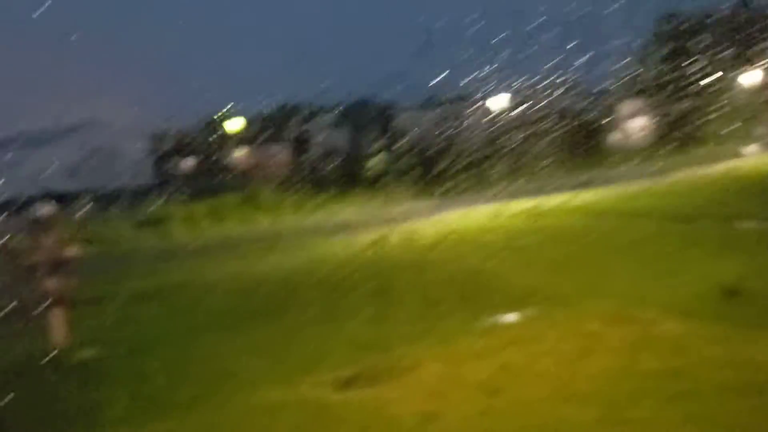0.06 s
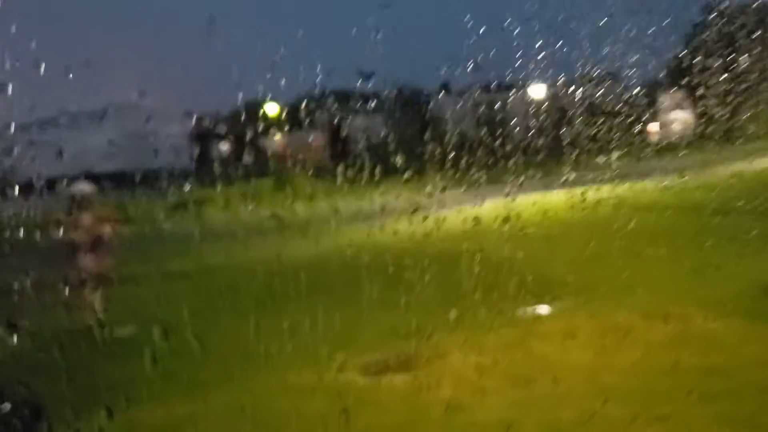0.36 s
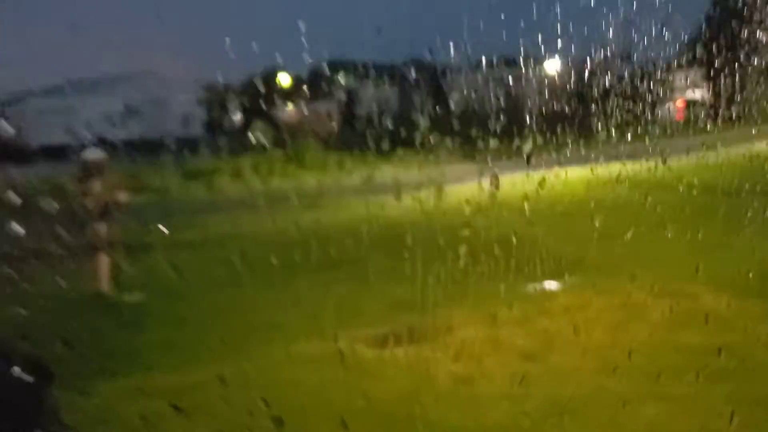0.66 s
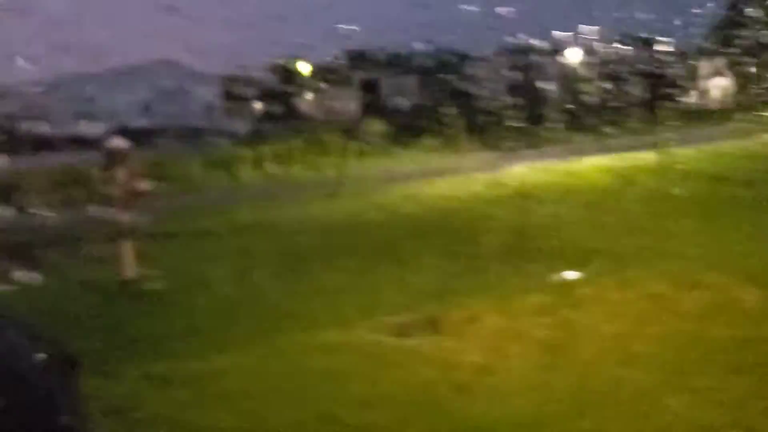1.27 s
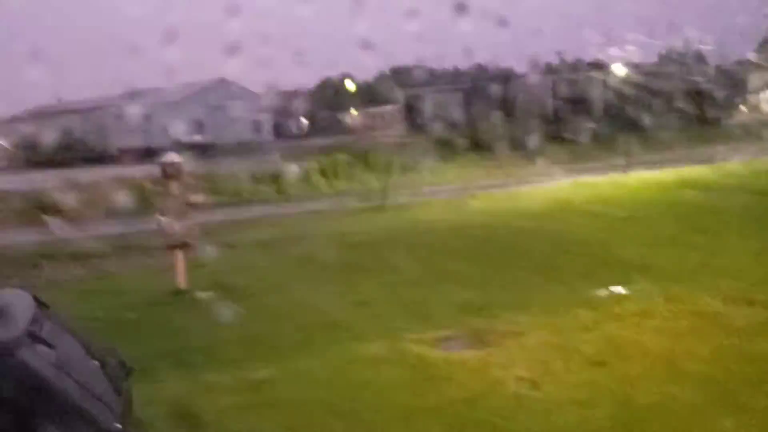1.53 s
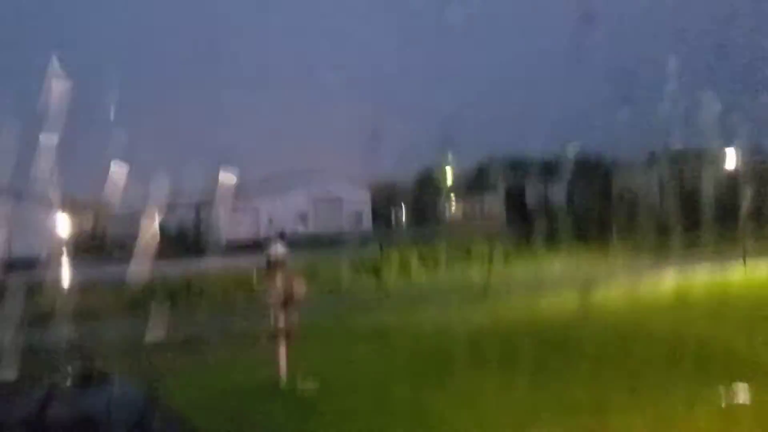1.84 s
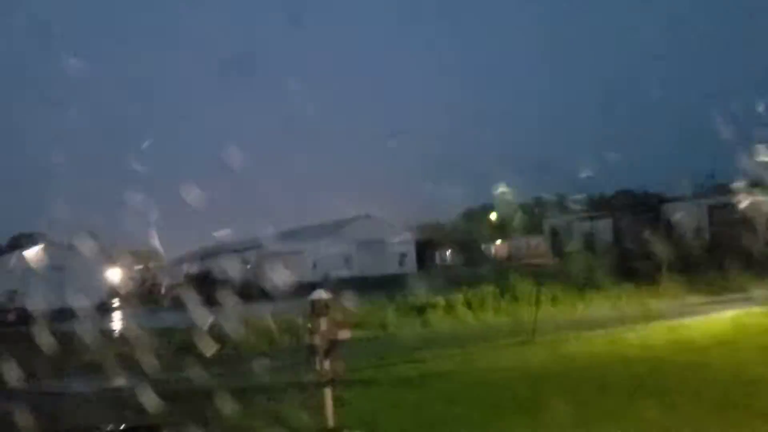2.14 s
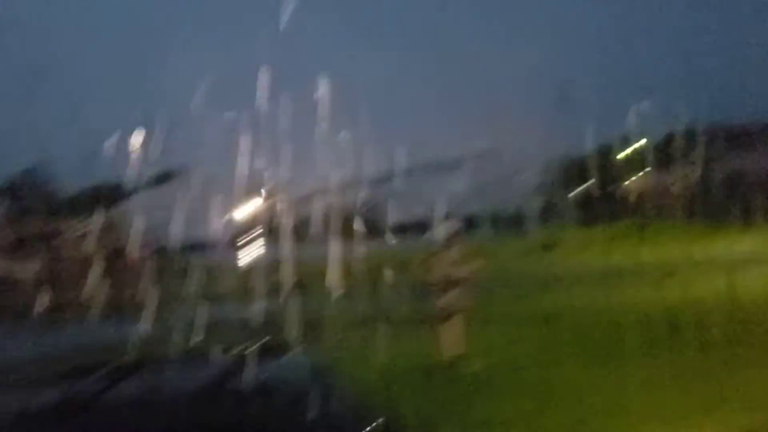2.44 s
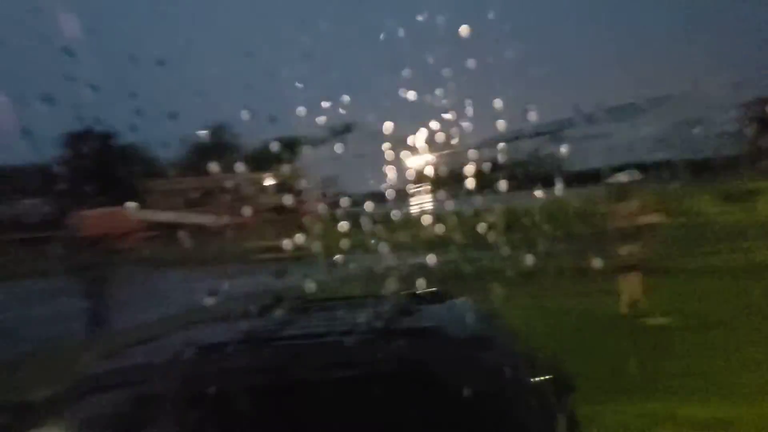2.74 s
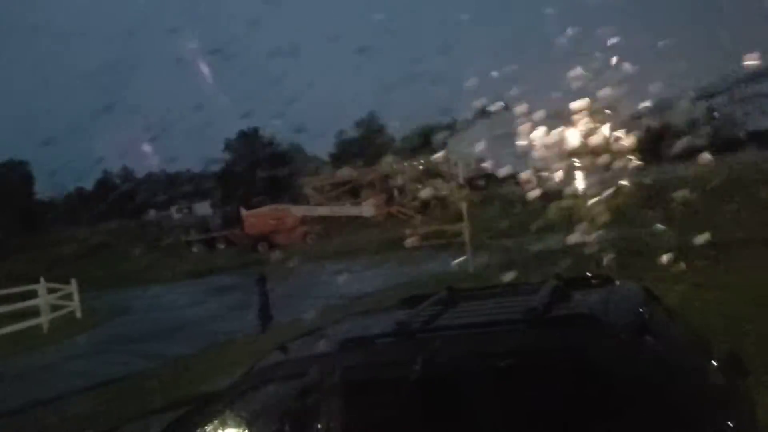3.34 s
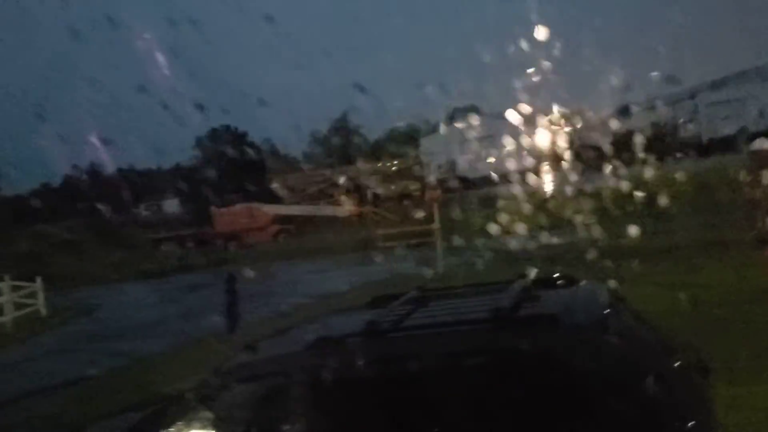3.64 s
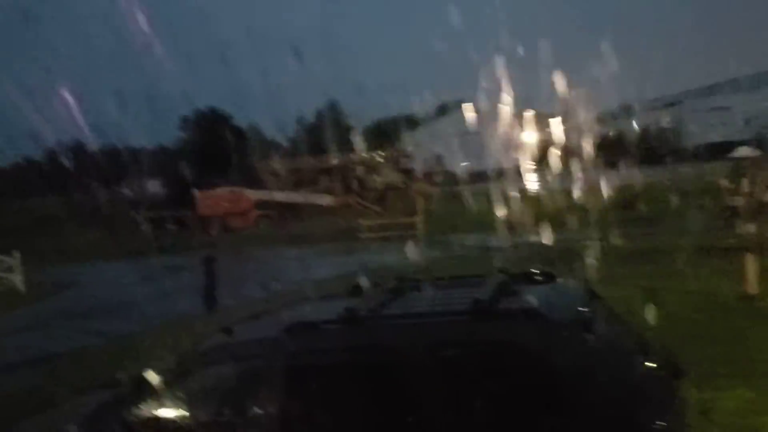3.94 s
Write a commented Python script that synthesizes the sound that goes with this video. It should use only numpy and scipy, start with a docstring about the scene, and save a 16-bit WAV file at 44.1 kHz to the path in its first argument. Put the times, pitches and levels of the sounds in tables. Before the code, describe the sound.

Deep thunder swells and keeps rolling, heard from a window over a soft hiss of rain. Close on the right, heavy drops or hail strike sharply and ring briefly in the room, with lighter ticks and one hollow plop between.

```python
"""Thunder breaks after a second and rolls on in deep peals, heard from a window over steady rain.
Heavy drops or hailstones crack on something hard close by, mostly to the right, and the room rings
after them. Lighter drops tick and splash in between, and one lands with a hollow plop.
The thunder is low noise plus short, wavering tones. The rain is a hiss of countless far drops.
Each hard hit is a brief push that makes the struck surface ring."""
import sys
import numpy as np
from scipy import signal
from scipy.fft import rfft, irfft, next_fast_len
from scipy.io import wavfile
from scipy.ndimage import uniform_filter1d, map_coordinates

SR = 44100
rng = np.random.default_rng(int(sys.argv[2]) if len(sys.argv) > 2 else 0)


def wrap_up_sound(samples):
    """Save the sound to the file named by the first command line argument, as 16-bit audio."""
    columns = np.atleast_2d(samples).T
    # keep every value between -1 and 1, then stretch to whole-number steps
    tamed = np.clip(columns, -1, 1)
    steps = np.round(tamed * 32767).astype(np.int16)
    wavfile.write(sys.argv[1], SR, steps)


N = 176400

# how loud the rain is, before its boosts (time [s], wash level [dB], hiss level [dB])
RAIN_LEVELS = [(0.0, -55, -69.5), (1.32, -57, -68.5), (1.95, -60.5, -73.5), (2.31, -61, -68),
               (2.97, -60, -75), (4.0, -62.5, -78)]
# tone of the rain's broad wash and of its finer hiss (frequency [Hz], level [dB])
WASH_TONE = [(100, -11.5), (400, 3.5), (800, 1), (1250, -3), (1800, -0.5), (2500, -4.5), (3200, -12.5),
             (4500, -34), (7000, -41)]
HISS_TONE = [(1500, -16), (3200, 0), (4000, 1), (5200, 0.5), (6400, -3.5), (6900, -14.5), (7400, -70.5),
             (12000, -17), (16000, -21)]
# how alike the rain is in both ears (frequency [Hz], likeness [0 to 1])
RAIN_LIKENESS = [(200, 0.63), (600, 0.41), (1200, 0), (6000, 0)]
# thin sizzles in the rain (peak time [s], level [dB], pitch [Hz], half length [s])
RAIN_SIZZLES = [(1.1, -70, 5220, 0.36), (2.14, -67.5, 4100, 0.13)]

# how long the room rings; a fade time is the time to fall by 60 dB (frequency [Hz], fade time [s])
ROOM_FADES = [(1000, 0.29), (3000, 0.37), (6000, 0.29), (10000, 0.28), (15000, 0.31)]
# tone the room gives its echo (frequency [Hz], level [dB])
ROOM_TONE = [(1800, 4), (6300, -2), (9000, 2), (15000, 4.5)]

# light drops, and the two contacts of the plop (time [s], level [dB])
TICK_HITS = [(0.032, -57), (0.114, -54.5), (1.341, -49), (2.7264, -54.5), (2.8393, -51), (3.241, -58),
             (3.64, -60)]
PLOP_HITS = [(2.728, -37.5), (2.735, -46)]
# the plop's hollow resonances (pitch [Hz], width [Hz], level [dB])
PLOP_RESONANCES = [(1174, 240, -6), (1720, 240, 7), (2680, 450, -14.5)]
# soft splashes (time [s], level [dB], fade time [s])
SPLASH_HITS = [(1.338, -60, 0.17), (3.54, -51, 0.32)]
# tone of a tick, a splash and a hard hit (frequency [Hz], level [dB])
TICK_TONE = [(800, -5), (2500, -8), (3850, 4), (5000, -1.5), (6400, -3.5), (7400, -29)]
SPLASH_TONE = [(400, 1), (1500, 2), (2600, -1), (3500, -13.5), (8000, -36)]
CRACK_TONE = [(300, -10.5), (1200, -11), (2300, -2.5), (4500, -2.5), (6200, -1), (6900, -7.5), (7700, -21),
              (8500, -19), (9500, -14.5), (12000, -18.5), (15500, -30)]

# hard hits (time [s], level [dB], treble tilt [dB per octave], top sparkle [dB], contact length [s],
# surface ring [dB], pitch of the struck spot [Hz], boost at that pitch [dB])
HARD_HITS = [(.9930, -37.5, -.5, 3.5, 0.022, 8, 3600, -2), (1.2036, -28, -1, 2.5, 0.023, 11, 1470, 14.5),
             (1.2226, -30, 2, -4.5, 0.04, 4.5, 2150, 2), (1.2285, -31, -3.5, 4, 0.01, 1.5, 6270, 9),
             (1.5060, -32.5, 0, 4, 0.011, 6, 2970, 8), (1.7135, -36, -3.5, -2, 0.0049, 3, 3780, 7.5),
             (1.7505, -34.5, 1, -2.5, 0.0027, 7, 3500, 7.5), (1.7626, -39, 1, -1, 0.0033, 4.5, 6300, 3.5),
             (2.2539, -35, -3, -1.5, .018, 6, 4100, 13), (2.2840, -33.5, 1, 0, .011, 3, 4000, 9.5),
             (2.2934, -42, -1, 4, .01, 8.5, 2640, 5.5), (3.2877, -28.5, 1.5, 3.5, .012, 13.5, 5640, 4.5)]
# how far right the hard hits sound (frequency [Hz], right over left [dB])
CRACK_RIGHT = [(1000, 5.5), (3500, 5), (5000, 3), (6300, 12), (8000, 1.5), (10000, -2), (12000, 5)]
# resonances of the struck surface (pitch [Hz])
SURFACE_PITCHES = [2230, 3764, 4780, 5895]

# how loud the thunder's deep boom and higher roll are, before their boost (time [s], level [dB])
BOOM_LEVELS = [(0.0, -48.5), (0.31, -40.5), (1.14, -43.5), (1.16, -26), (1.34, -27.5), (1.36, -32),
               (1.65, -34.5), (1.94, -20.5), (2.0, -31), (2.39, -22.5), (2.52, -36), (2.62, -24.5),
               (3.82, -30), (4.0, -36)]
ROLL_LEVELS = [(0.0, -43.5), (1.17, -37.5), (1.19, -30.5), (1.5, -32.5), (1.59, -39), (1.88, -29),
               (1.96, -33), (2.36, -27.5), (2.52, -35.5), (2.55, -30), (3.05, -29), (4.0, -38)]
# tone of the boom and of the roll (frequency [Hz], level [dB])
BOOM_TONE = [(20, -39.5), (30, -23), (40, 4.5), (54, 2.5), (68, 5.5), (86, 8.5), (105, -7.5), (130, -3),
             (250, -85.5)]
ROLL_TONE = [(70, -36), (105, 2.5), (122, -2), (150, -0.5), (178, -6.5), (205, -6), (270, -14.5),
             (350, -19.5), (500, -30.5), (800, -44.5), (2500, -87.5)]
# how alike the thunder is in both ears (frequency [Hz], likeness [0 to 1])
THUNDER_LIKENESS = [(60, 0.97), (150, 1), (280, 0.93), (600, 0.63)]
# the heaviest peals (peak time [s], level [dB], pitch [Hz], half length [s])
THUNDER_PEALS = [(1.323, -17, 77.5, 0.015), (1.445, -23.5, 87.1, 0.026), (1.747, -24.5, 58.24, 0.039),
                 (1.911, -22, 58.23, 0.065), (2.278, -22.5, 72.1, 0.048), (2.347, -28.5, 141.4, 0.08),
                 (2.637, -18.5, 45.45, 0.03), (2.647, -24, 150.4, 0.017), (2.773, -19.5, 86.24, 0.047),
                 (3.062, -17.5, 68.55, 0.021), (3.351, -25.5, 45.84, 0.053)]

TIME = np.arange(N) / SR  # seconds into the scene
AGE = np.arange(SR // 2) / SR  # seconds since a drop landed


def amp(db):
    """Turn decibels into a gain to multiply by."""
    return 10 ** (np.asarray(db) / 20)


def unit(x):
    """Scale a signal to an average power of 1."""
    return x / np.sqrt(np.mean(x ** 2) + 1e-20)


def along(points, hz):
    """Look up a frequency in a table, sliding between its rows on a log scale."""
    frequencies, values = np.transpose(points)
    return np.interp(np.log(hz + 1), np.log(frequencies + 1), values)


def curves(rows):
    """Turn each column after the time into one value per sample."""
    times, *columns = np.transpose(rows)
    return [np.interp(TIME, times, column) for column in columns]


def filtered(x, gain):
    """Make each frequency of x louder or softer by gain(frequency)."""
    n = x.shape[-1]
    padded = next_fast_len(n + 8192)
    return irfft(rfft(x, padded) * gain(np.fft.rfftfreq(padded, 1 / SR)), padded)[..., :n]


def resonance(hz, pitch, width):
    """A gain that is 1 at the pitch and falls away on both sides."""
    return 1 / np.sqrt(1 + (2 * (hz - pitch) / width) ** 2)


def wobble(u):
    """A smooth random curve with a new value at each whole step of u."""
    return map_coordinates(rng.standard_normal(int(u.max()) + 4), [u])


def swell(peak_s, db, half_s):
    """A smooth rise and fall around a time."""
    return amp(db) * np.exp(-((TIME - peak_s) / half_s) ** 2)


def lean(right_db):
    """Left and right gains that move a sound to the right."""
    return amp(np.array([[-.5], [.5]]) * right_db)


def add(out, start_s, sound):
    """Mix a sound in at a time."""
    i = max(round(start_s * SR), 0)
    out[:, i:i + sound.shape[1]] += sound[:, :N - i]


def spread(pair, tone, likeness):
    """Give two noises a tone and blend them, so both ears hear partly the same."""
    def gains(hz):
        angle = np.arccos(np.clip(along(likeness, hz), -1, 1)) / 2
        return amp(along(tone, hz)) * [np.cos(angle), np.sin(angle)]
    mid, side = filtered(pair, gains)
    return unit(np.array([mid + side, mid - side]))


def burst(gain):
    """Half a second of filtered stereo noise."""
    return unit(filtered(rng.standard_normal((2, len(AGE))), gain))


def patter(tone, drops_per_s, drops_db):
    """Countless far drops blur into noise, with single nearer ones on top."""
    drops = (rng.random((2, N)) < drops_per_s / SR) * rng.standard_normal((2, N))
    return spread(rng.standard_normal((2, N)) + amp(drops_db) * unit(drops), tone, RAIN_LIKENESS)


def rain(wash_boost_db=2.5, hiss_boost_db=3):
    """A wash from the lawn, a finer hiss and now and then a thin ringing sizzle."""
    wash_db, hiss_db = curves(RAIN_LEVELS)
    wash = amp(wash_db + wash_boost_db) * patter(WASH_TONE, drops_per_s=500, drops_db=-8.0)
    hiss = amp(hiss_db + hiss_boost_db) * patter(HISS_TONE, drops_per_s=180, drops_db=-17.5)
    sizzle = np.zeros((2, N))
    for peak_s, db, pitch, half_s in RAIN_SIZZLES:
        narrow_noise = filtered(rng.standard_normal((2, N)), lambda hz: resonance(hz, pitch, width=110))
        sizzle += swell(peak_s, db, half_s) * unit(narrow_noise)
    return (wash + hiss + sizzle) * lean(right_db=4.5)


def room_echo(gain, rise_s=0.0043):
    """The room rings after a hit, and each frequency fades at its own speed."""
    hz, age, spectrum = signal.stft(burst(gain), SR, nperseg=256)
    fade_db = along(ROOM_TONE, hz)[:, None] - 60 * age / along(ROOM_FADES, hz)[:, None]
    tail = signal.istft(spectrum * amp(fade_db), SR, nperseg=256)[1][:, :len(AGE)]
    return tail * (1 - np.exp(-AGE / rise_s))


def drip(gain, fade_s, room_db, rise_s=0.00048):
    """A light drop lands: a short burst of noise, then the room's echo."""
    direct = burst(gain) * amp(-60 * AGE / fade_s) * (1 - np.exp(-AGE / rise_s))
    return direct + amp(room_db) * room_echo(gain)


def light_drops(splash_rise_s=0.0055):
    """Small drops nearby land with ticks, a hollow plop and soft splashes."""
    out = np.zeros((2, N))
    tick = lambda hz: amp(along(TICK_TONE, hz))
    for start_s, db in TICK_HITS:
        add(out, start_s, amp(db) * drip(tick, fade_s=0.035, room_db=-9.5))
    hollow = lambda hz: sum(amp(db) * resonance(hz, pitch, width) ** 2
                            for pitch, width, db in PLOP_RESONANCES)
    for start_s, db in PLOP_HITS:
        add(out, start_s, amp(db) * drip(hollow, fade_s=0.06, room_db=-25.0))
    splash = lambda hz: amp(along(SPLASH_TONE, hz))
    for start_s, db, fade_s in SPLASH_HITS:
        loudness = amp(db - 60 * AGE / fade_s) * (1 - np.exp(-AGE / splash_rise_s))
        add(out, start_s, loudness * burst(splash))
    return out * lean(right_db=8.5)


def ringing(push, gain):
    """A surface rings only after it is pushed, never before (a minimum-phase filter)."""
    n = push.shape[-1]
    cepstrum = irfft(np.log(gain(np.fft.rfftfreq(n, 1 / SR)) + 1e-6), n)
    fold_forward = 1 + np.sign(n / 2 - np.arange(n)) * (np.arange(n) > 0)
    return irfft(rfft(push) * np.exp(rfft(cepstrum * fold_forward)), n)


def snap(gain, contact_s, spike_db=-2):
    """One hard contact: a spike of force and a brief spatter make the surface ring."""
    n = len(AGE)
    spatter = unit(rng.standard_normal((2, n)) * amp(-60 * AGE / contact_s))
    spike = unit(signal.unit_impulse(n)) * rng.choice([-1, 1], (2, 1))
    spectrum = rfft(spike * amp(spike_db) + spatter)
    push = irfft(spectrum / (abs(spectrum) + 1e-9), n)  # all frequencies equally strong
    return unit(ringing(push * (AGE < contact_s), gain))


def cracks():
    """Heavy drops or hailstones hit and bounce once; each struck spot rings with its own tone."""
    direct_db, bounce_db, bounce_s = -26.5, -4.5, 0.004
    room_db, room_share = -9, 0.46  # the echo keeps this share of the spot's own tone
    ripple_db, ripple_hz, sparkle_above_hz = 2.6, 260, 7500
    out = np.zeros((2, N))
    grid_hz = np.linspace(0, SR / 2, SR // 20)
    surface = sum(resonance(grid_hz, pitch, width=520) ** 2 for pitch in SURFACE_PITCHES)
    for start_s, db, tilt_db, sparkle_db, contact_s, ring_db, spot_hz, spot_db in HARD_HITS:
        spot = resonance(grid_hz, spot_hz, width=spot_hz / 5) ** 2
        own_db = ring_db * surface + spot_db * spot + ripple_db * wobble(grid_hz / ripple_hz)

        def gain(hz, share=1):
            tilt = tilt_db * np.log2((hz + 100) / 4000)
            sparkle = sparkle_db / (1 + (sparkle_above_hz / (hz + 1)) ** 10)
            own = share * np.interp(hz, grid_hz, own_db)
            return amp(along(CRACK_TONE, hz) + tilt + sparkle + own) * lean(along(CRACK_RIGHT, hz))

        direct = amp(db + direct_db) * snap(gain, contact_s)
        echo = amp(db + room_db) * room_echo(lambda hz: gain(hz, room_share))
        bounce = amp(db + direct_db + bounce_db) * snap(gain, contact_s)
        add(out, start_s, direct + echo)
        add(out, start_s + bounce_s, bounce)
    return out


def rumble(tone, smooth_samples):
    """Low noise with its slow, random swells evened out."""
    noise = spread(rng.standard_normal((2, N)), tone, THUNDER_LIKENESS)
    power = np.mean(noise ** 2, axis=0)
    power = uniform_filter1d(uniform_filter1d(power, smooth_samples), smooth_samples)
    return unit(noise / np.sqrt(abs(power) + 1e-3))


def thunder(boost_db=0.5, wander_radians=0.45):
    """A deep boom that gathers into heavy peals, under a steadier roll."""
    strength = amp(curves(BOOM_LEVELS)[0] + boost_db)
    peal_strength = sum(swell(peak_s, db, half_s) for peak_s, db, _, half_s in THUNDER_PEALS)
    give_way = strength / np.hypot(strength, peal_strength)  # the boom dips during a peal
    boom = strength * give_way * rumble(BOOM_TONE, smooth_samples=1600)
    roll = amp(curves(ROLL_LEVELS)[0] + boost_db) * rumble(ROLL_TONE, smooth_samples=2400)
    peals = np.zeros(N)
    for peak_s, db, pitch, half_s in THUNDER_PEALS:
        phase = 2 * np.pi * (pitch * TIME + rng.random())
        wander = wander_radians * wobble(TIME * pitch / 2)
        peals += swell(peak_s, db, half_s) * np.sqrt(2) * np.sin(phase + wander)
    return (boom + roll + peals) * lean(right_db=2.5)


def scene():
    """The storm and the near drops together."""
    return thunder() + rain() + cracks() + light_drops()


def record(dry, edge_s=0.008, top_hz=15830):
    """Start and end the sound softly, and cut away the very highest treble."""
    edges = np.clip(np.minimum(TIME, TIME[::-1]) / edge_s, 0, 1)
    return filtered(dry * edges, lambda hz: hz < top_hz)


dry = scene()
out = record(dry)
wrap_up_sound(out)
```